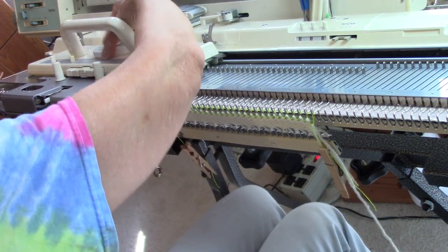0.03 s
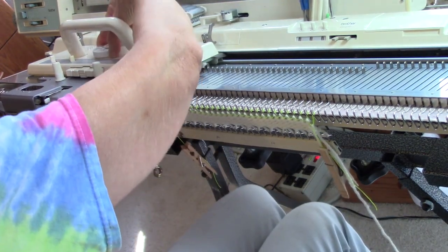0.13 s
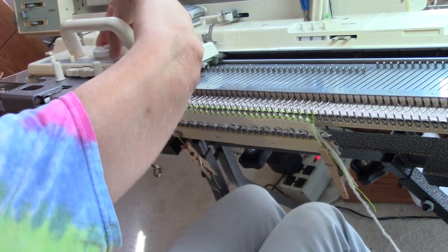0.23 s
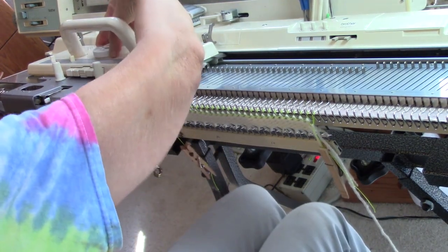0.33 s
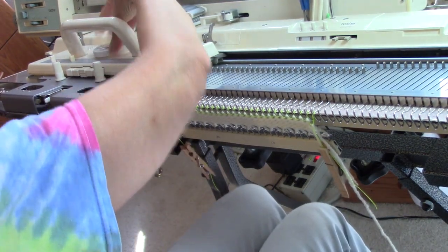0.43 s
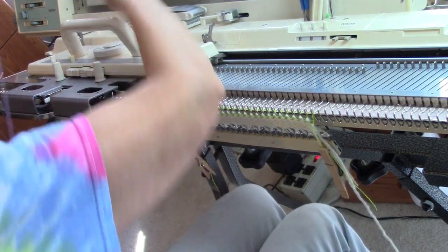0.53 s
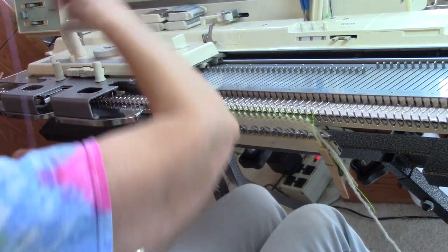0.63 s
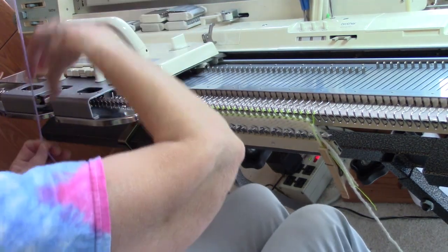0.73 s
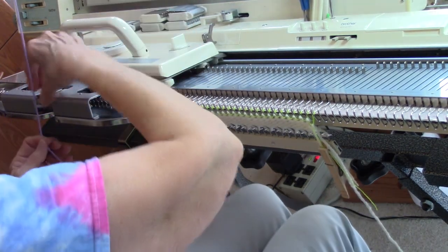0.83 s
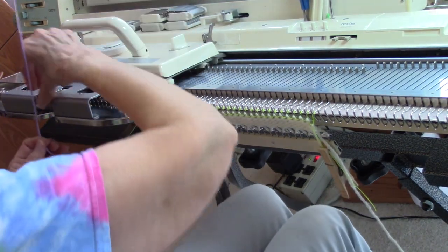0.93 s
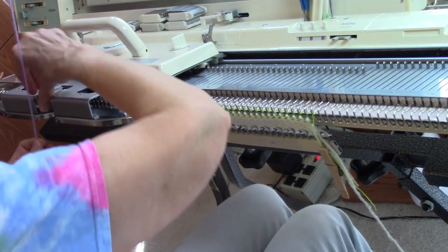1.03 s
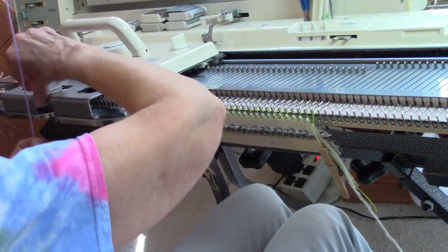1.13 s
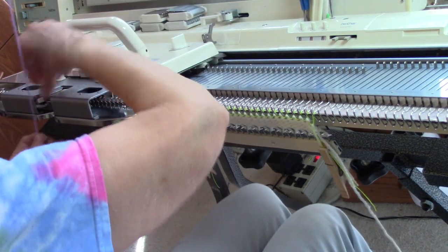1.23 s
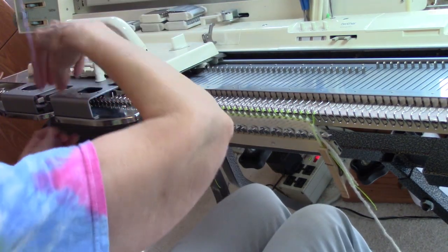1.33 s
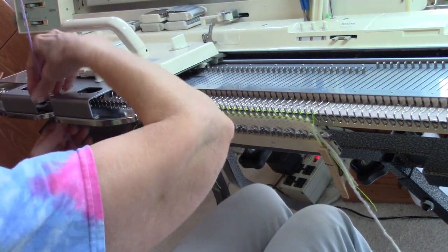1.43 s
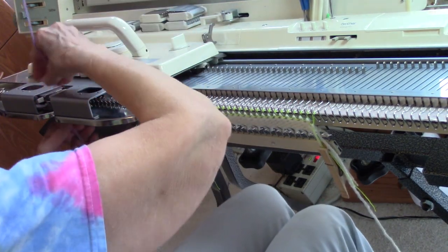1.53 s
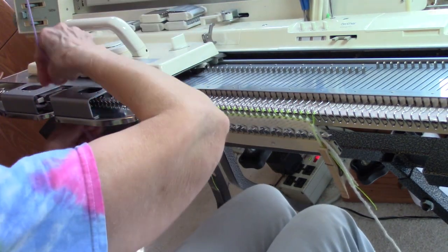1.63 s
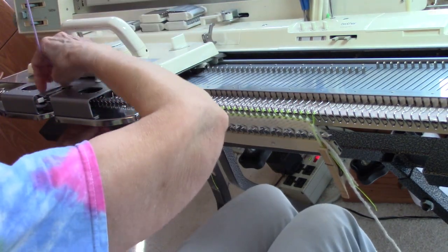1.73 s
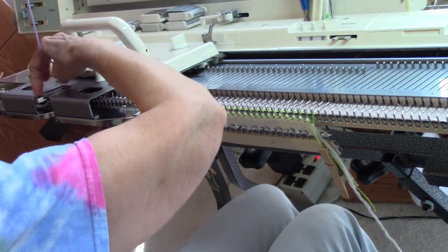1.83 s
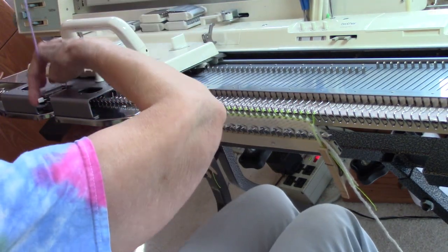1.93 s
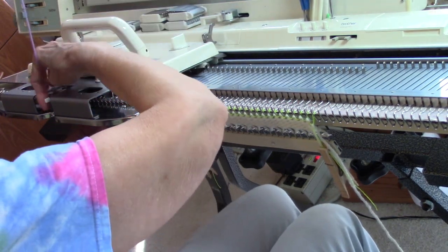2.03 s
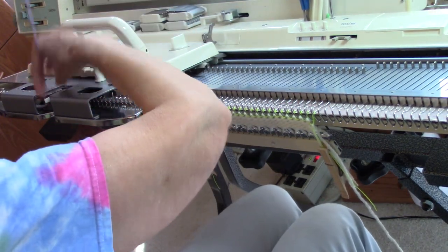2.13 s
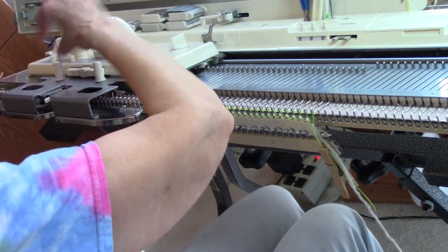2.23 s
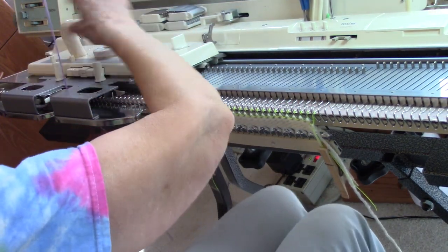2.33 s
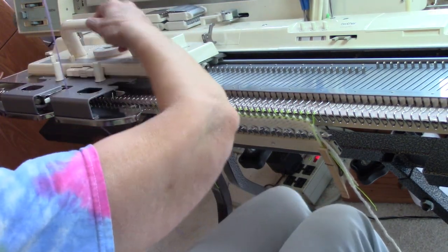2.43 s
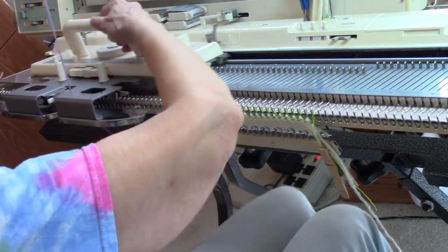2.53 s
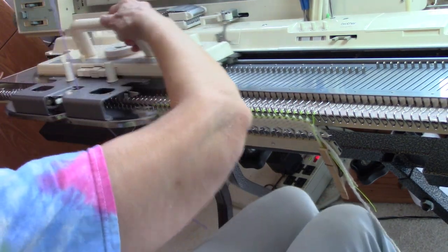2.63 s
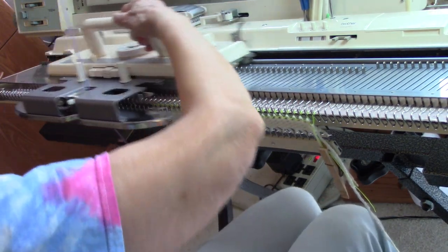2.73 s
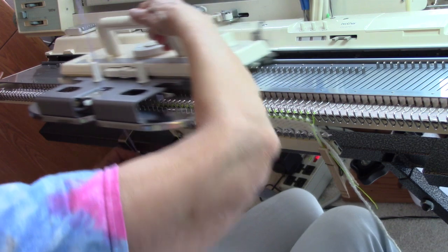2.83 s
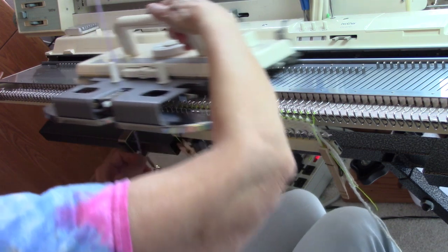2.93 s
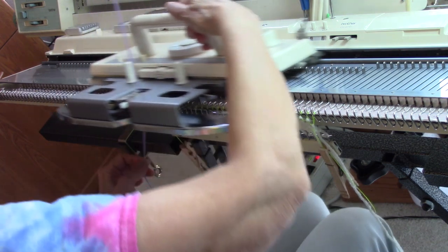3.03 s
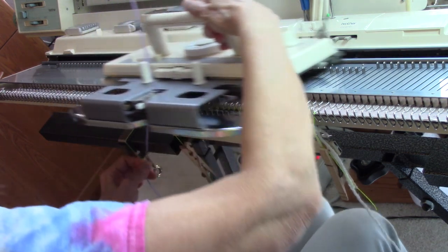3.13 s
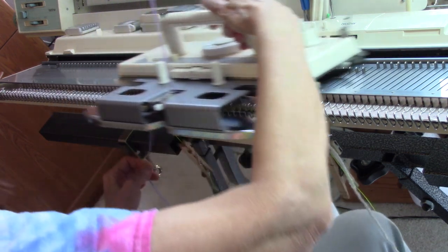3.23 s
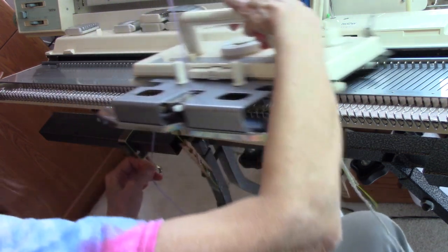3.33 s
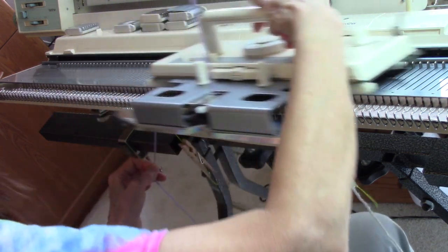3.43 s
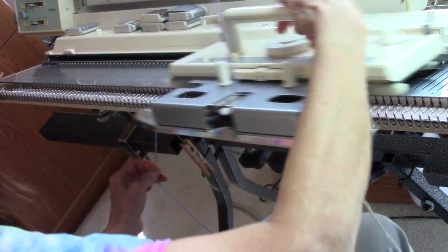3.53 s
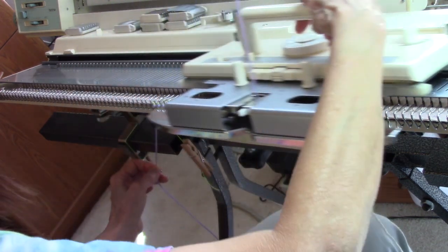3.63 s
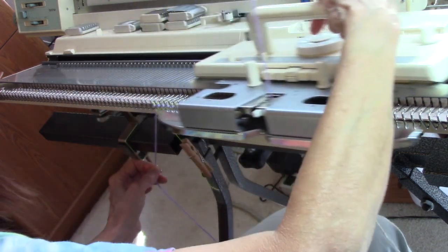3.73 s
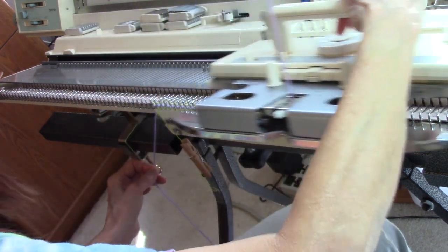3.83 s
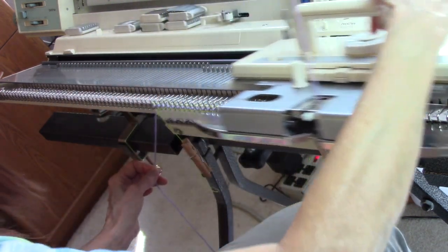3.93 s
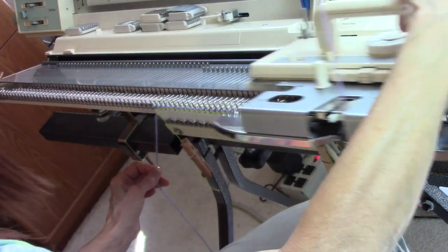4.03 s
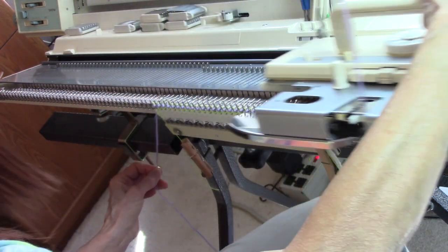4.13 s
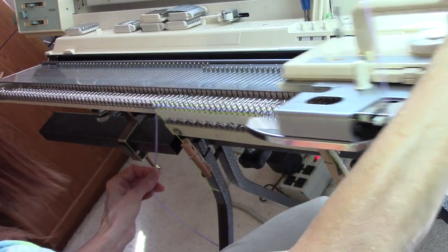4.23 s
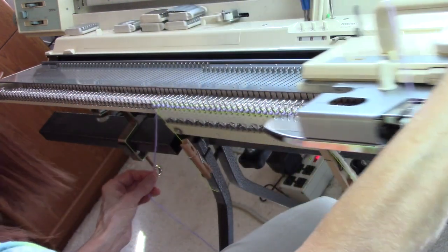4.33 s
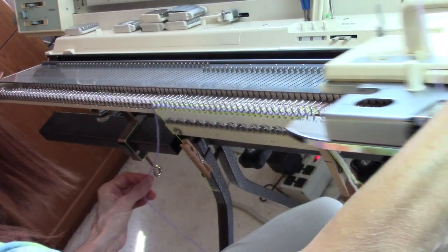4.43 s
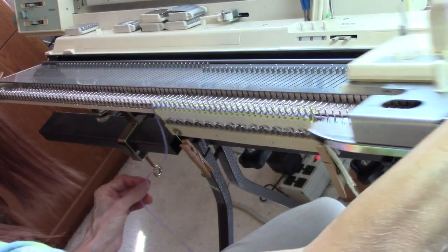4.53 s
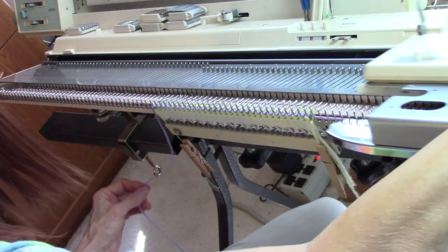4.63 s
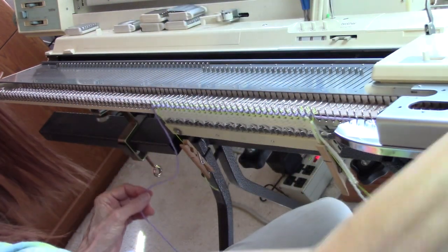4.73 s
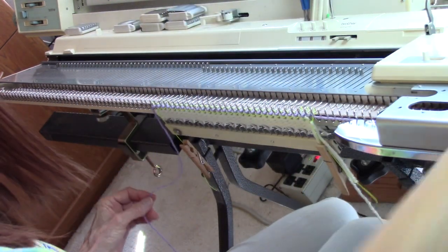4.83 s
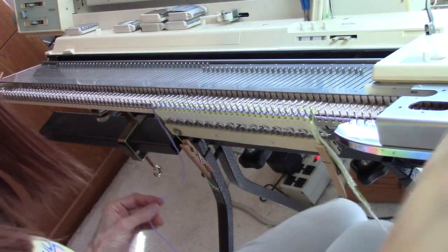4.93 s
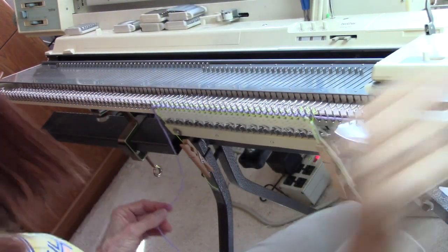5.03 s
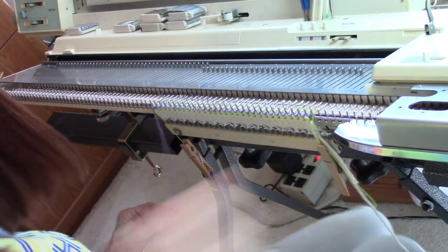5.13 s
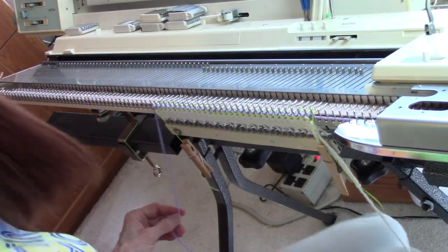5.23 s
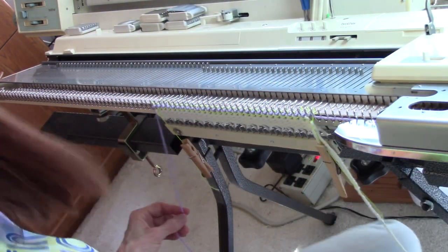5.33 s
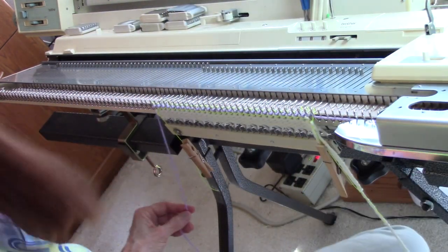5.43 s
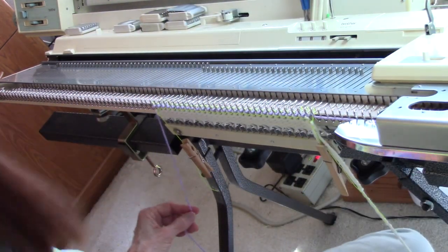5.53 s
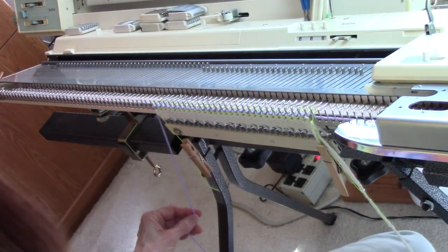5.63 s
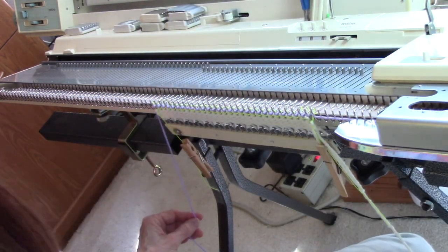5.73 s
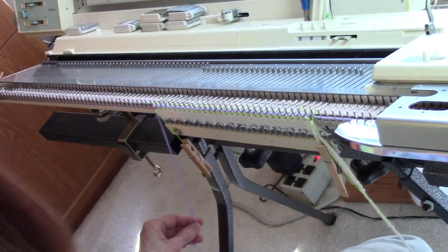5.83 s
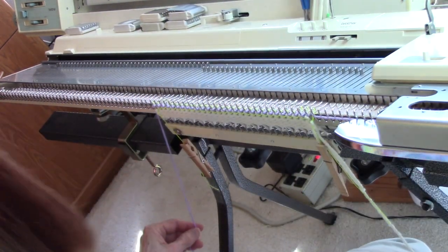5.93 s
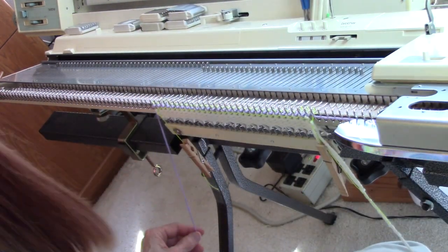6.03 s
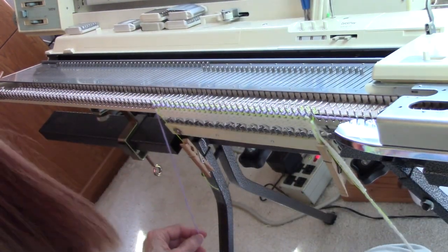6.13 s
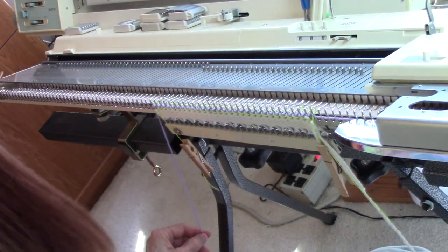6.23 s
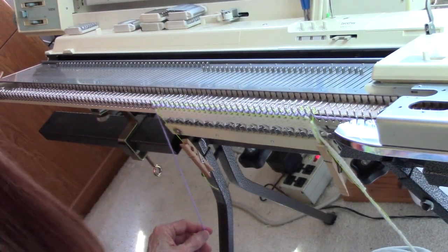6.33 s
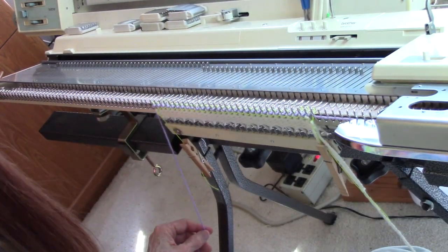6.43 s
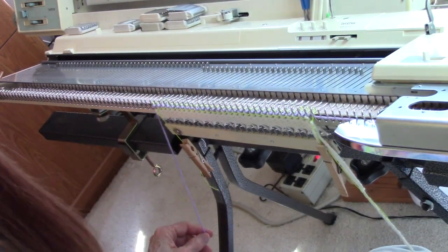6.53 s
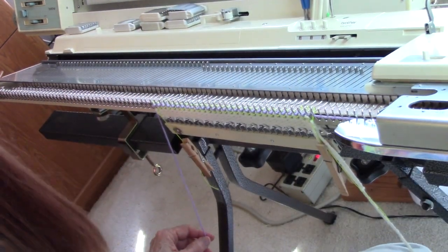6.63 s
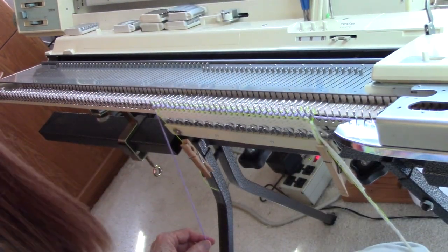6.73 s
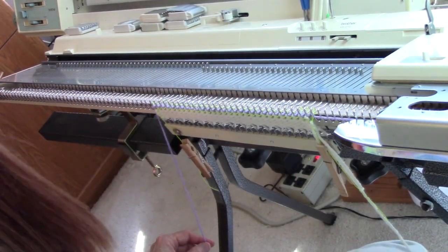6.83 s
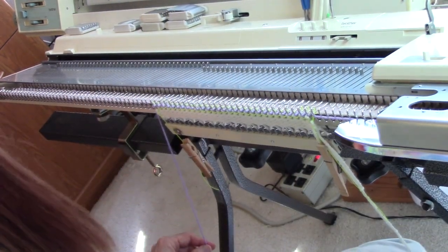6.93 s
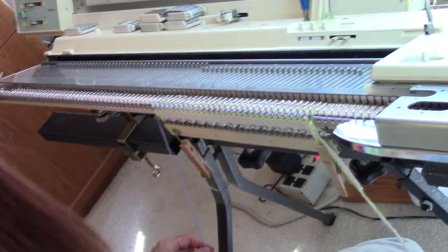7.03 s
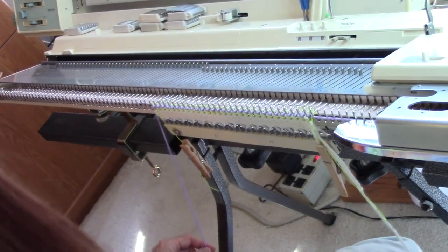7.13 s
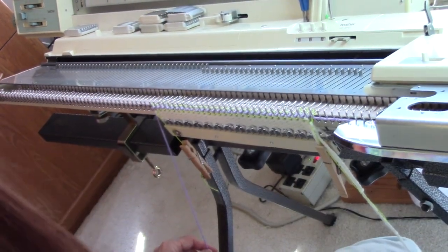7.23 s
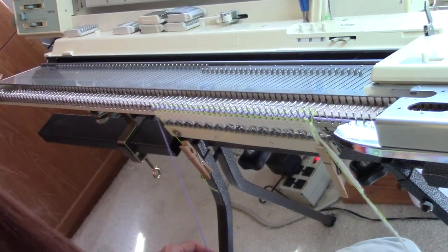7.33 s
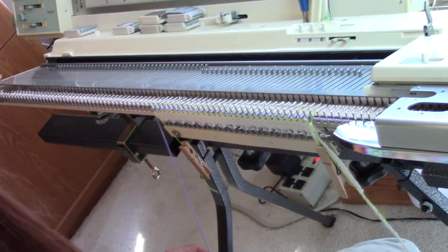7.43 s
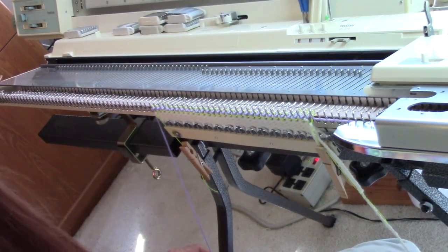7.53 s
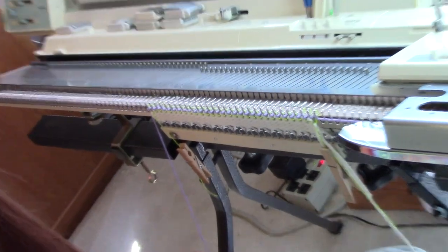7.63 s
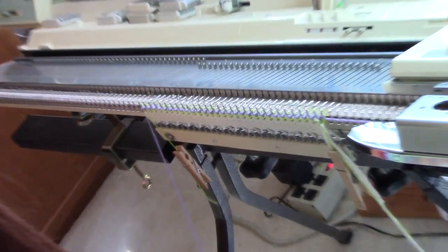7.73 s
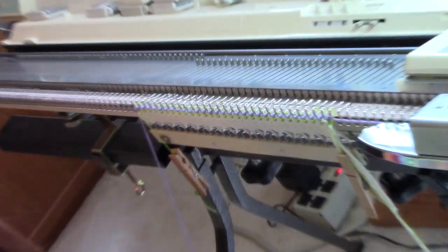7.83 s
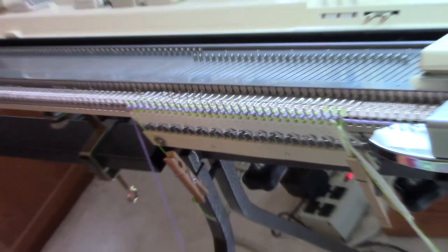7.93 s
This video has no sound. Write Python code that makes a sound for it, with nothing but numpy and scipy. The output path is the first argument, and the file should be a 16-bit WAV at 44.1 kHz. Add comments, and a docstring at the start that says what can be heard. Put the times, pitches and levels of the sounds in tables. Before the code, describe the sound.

Levers click, then a knitting machine carriage rushes across the needle bed in a loud metallic clatter, clunks to a stop, then close finger taps.

```python
"""Knitting machine in a small room

Levers click, then the carriage is pushed from left to right over the needle bed in a rush of tiny steel
impacts, clunks on the way and rattles to a stop; later fingers tap and rub a camera in the room.
Contacts are random impulses shaping coloured noise, blows are decaying noise bursts, steel rings as
decaying tones. Room noise and faint camera ticks run throughout.
"""
import sys
import numpy as np
from scipy import signal
from scipy.fft import rfft, irfft, next_fast_len
from scipy.io import wavfile
from scipy.ndimage import uniform_filter1d, map_coordinates

SR = 44100
rng = np.random.default_rng(int(sys.argv[2]) if len(sys.argv) > 2 else 0)


def wrap_up_sound(samples):
    """Save the sound to the file named by the first command line argument, as 16-bit audio."""
    columns = np.atleast_2d(samples).T
    # keep every value between -1 and 1, then stretch to whole-number steps
    tamed = np.clip(columns, -1, 1)
    steps = np.round(tamed * 32767).astype(np.int16)
    wavfile.write(sys.argv[1], SR, steps)


N = 352800


def amp(db):
    """Decibels to gain."""
    return 10 ** (np.asarray(db) / 20)


def unit(x):
    """Scaled to rms 1."""
    return x / np.sqrt(np.mean(x ** 2) + 1e-20)


def clock():
    """Time of every sample in seconds."""
    return np.arange(N) / SR


def along(points, hz):
    """Curve through (Hz, value) points, read on a log frequency axis."""
    point_hz, value = np.transpose(points)
    return np.interp(np.log(hz + 1), np.log(point_hz), value)


def filtered(x, response):
    """x times a response of frequency, zero-padded against wrap-around."""
    size = next_fast_len(N + SR // 2, True)
    spectrum = rfft(x, size) * response(np.fft.rfftfreq(size, 1 / SR))
    return irfft(spectrum, size)[..., :N]


def bands(colour, low_hz, high_hz):
    """Independent coloured noises for the low, middle and high band, rms 1 each."""
    def above(hz, edge_hz):
        return 1 / (1 + (edge_hz / (hz + 1)) ** 12)

    power_shares = [
        lambda hz: 1 - above(hz, low_hz),
        lambda hz: above(hz, low_hz) * (1 - above(hz, high_hz)),
        lambda hz: above(hz, high_hz)]
    noises = []
    for share in power_shares:
        response = lambda hz: amp(along(colour, hz)) * np.sqrt(share(hz))
        noises.append(unit(filtered(rng.standard_normal(N), response)))
    return np.array(noises)


def fading(t, t60_s, attack_s):
    """Quick rise times exponential decay."""
    return amp(-60 * t / t60_s) * (1 - np.exp(-t / attack_s))


def add(track, start_s, sound):
    """Mix a sound into a track in place."""
    part = track[..., max(round(start_s * SR), 0):][..., :sound.shape[-1]]
    part += sound[..., :part.shape[-1]]


def resonate(x, peaks):
    """Each resonance in turn lifts its own band and rings on briefly."""
    for hz, width_hz, lift_db in peaks:
        b, a = signal.iirpeak(hz, hz / width_hz, SR)
        x = x + (amp(lift_db) - 1) * signal.lfilter(b, a, x)
    return x


def wobble(knots_hz):
    """Smooth random curve through knots_hz random knots a second."""
    knots = rng.standard_normal(int(N * knots_hz / SR) + 4)
    return map_coordinates(knots, [clock() * knots_hz])


def impacts(rate_hz, spread_db, life_s):
    """Envelope of rms 1: random contacts of random energy, each energy decaying over life_s."""
    hits = rng.random(N) < rate_hz / SR
    energy = hits * amp(spread_db * rng.standard_normal(N)) ** 2 / rate_hz
    decay = np.exp(-1 / (life_s * SR))
    return unit(np.sqrt(signal.lfilter([1], [1, -decay], energy)))


def friction(strokes, colour, slip_hz):
    """Strokes that swell and die away, made of tiny random slips."""
    _, middle, treble = bands(colour, 510, 4400)
    out = np.zeros(N)
    for peak_s, db, rise_s, fall_s, treble_db in strokes:
        pressure = np.interp(clock(), [peak_s - rise_s, peak_s, peak_s + fall_s], [0, 1, 0])
        out += amp(db) * pressure * (middle + amp(treble_db) * treble)
    return out * impacts(rate_hz=slip_hz, spread_db=4, life_s=.001)


def blows(rows, noise, t60_s, attack_s, trim_db):
    """Bursts of low, middle and high noise, each band with its own rise and decay."""
    force, t = np.zeros((3, N)), np.arange(SR // 5) / SR
    shape = fading(t, np.array(t60_s)[:, None], np.array(attack_s)[:, None])
    for start_s, db, low_db, high_db in rows:
        band_db = db + np.array([low_db, 0, high_db]) + trim_db
        add(force, start_s, amp(band_db)[:, None] * shape)
    return np.sum(force * noise, axis=0)


def clangs(rows):
    """A struck part rings in a tight cluster of modes: one decaying tone whose phase wanders."""
    out, t = np.zeros(N), np.arange(SR // 3) / SR
    for start_s, db, hz, width_hz, t60_s in rows:
        steps = rng.standard_normal(len(t))
        wander = np.cumsum(steps) * np.sqrt(2 * np.pi * width_hz / SR)
        wander = uniform_filter1d(wander, size=40)
        tone = np.sin(2 * np.pi * hz * t + wander)
        add(out, start_s, amp(db) * tone * fading(t, t60_s, .0012))
    return out


# Colour of the room noise. Each row: frequency in Hz, relative level in dB per Hz.
AIR_COLOUR = [(15, -49), (25, -25.5), (49, -21.5), (117, -8.5), (149, -2.5), (317, -5), (344, -5.5),
              (677, -10), (818, -14.5), (1560, -17.5), (1840, -19.5), (2000, -21), (4610, -28),
              (9320, -34.5), (16000, -45)]
# Left-right correlation of the room noise. Each row: frequency in Hz, correlation [0..1].
AIR_LIKENESS = [(60, 0.82), (180, 0.91), (550, 0.84), (1650, 0.74), (4970, 0.65), (15000, 0.93)]
AIR_RMS_DB = -53


def room_noise():
    """Steady low rush: shared mid noise plus side noise sets the left-right correlation."""
    def mid_and_side(hz):
        turn_rad = np.arccos(np.clip(along(AIR_LIKENESS, hz), -1, 1)) / 2
        return amp(along(AIR_COLOUR, hz)) * [np.cos(turn_rad), np.sin(turn_rad)]

    mid, side = filtered(rng.standard_normal((2, N)), mid_and_side)
    return amp(AIR_RMS_DB) * unit(np.array([mid + side, mid - side]))


# Hand and yarn brushing and jiggling the carriage. Each row: peak time in seconds, level in dB,
# rise in seconds, fall in seconds, treble in dB re middle band.
BRUSHES = [(.002, -40, .04, 0.13, -15), (.295, -53, 0.049, 0.059, -24), (1.69, -65.5, 0.19, 0.16, 3),
           (2.69, -53.5, 0.17, 0.15, -7), (4.8, -56, 0.057, 0.064, -11)]
# Colour of the carriage's plastic shell. Each row: frequency in Hz, relative level in dB per Hz.
SHELL_COLOUR = [(60, -29), (200, -6), (380, -2), (600, 6), (950, 1.5), (1350, -3), (2100, -7.5),
                (3000, -11), (3700, -10.5), (4600, -18), (7500, -18.5), (9000, -16), (12000, -28),
                (16000, -37)]


def brushes():
    """Hand and yarn slip over the carriage shell."""
    return friction(BRUSHES, SHELL_COLOUR, slip_hz=1200)


# The whole carriage knocking on its rail. Each row: start in seconds, level in dB before band trims,
# low band in dB re level, high band in dB re level.
KNOCKS = [(0.0226, -24, -10.5, -12), (0.0688, -22.5, -12, -13), (0.1115, -22, -11, -11),
          (0.312, -33, -2.5, -24), (0.3501, -40.5, 0.5, -28), (0.443, -52.5, 8.5, -21),
          (0.5033, -47, 0.5, -21), (0.6275, -53.5, 6, -21), (0.6864, -49.5, 1, -18),
          (2.4976, -45, 0.5, -18), (2.516, -44.5, -2, -21), (4.3177, -24, -24, -17.5),
          (4.359, -43.5, -8, -4), (4.3885, -18.5, -17, -13)]


def knocks():
    """The carriage rocks on its rail: duller and longer than a snap."""
    noise = bands(SHELL_COLOUR, 1180, 4500)
    return blows(KNOCKS, noise, t60_s=[.11, .07, .055], attack_s=[.0012, .0008, .0004], trim_db=[1, -6, 0])


def camera_ticks():
    """The camera's mechanism ticks about fifteen times a second: gated noise around 2 kHz."""
    t = (clock() - .049) % (1 / 14.985)
    tone = filtered(rng.standard_normal(N), lambda hz: 1 / (1 + ((hz - 2020) / 230) ** 2))
    return amp(-55.5) * unit(tone) * fading(t, .05, .002)


# Levers, cams and needles snapping. Each row: start in seconds, level in dB before trims,
# body in dB re level, treble in dB re level.
CLICKS = [(0.9716, -44, -14, -3.5), (1.066, -47.5, -9, -5.5), (1.1022, -31, -11.5, 1),
          (2.013, -34, -23, 13), (2.0163, -20, -9.5, -13), (2.6775, -31.5, -22, -15.5),
          (2.7826, -27.5, -19, -9), (3.242, -7.5, -13.5, -4.5), (4.093, -13, -39, -10.5),
          (4.1084, -25, -8.5, -3), (4.1423, -24.5, -16, -6.5), (4.178, -22, -29, -12),
          (4.1903, -17.5, -23, -6.5), (5.2178, -58.5, -11, 7.5), (5.924, -46, -14, -9)]
# Steel modes rung by each snap. Each row: frequency in Hz, relative level in dB, t60 in seconds.
STEEL_MODES = [(784, 3.5, 0.21), (1252, 0.5, 0.101), (1623, -9.5, 0.22), (1727, 0, 0.22), (3090, -30, 0.37),
               (3300, -15, 0.27), (3670, -22.5, 0.21), (5570, -10.5, 0.17), (7800, -22.5, 0.24),
               (8861, -19.5, 0.15), (9313, -33.5, 0.2), (9800, -38.5, 0.26)]
# Colour of a steel lever snapping. Each row: frequency in Hz, relative level in dB per Hz.
LEVER_COLOUR = [(60, -37), (300, -13.5), (500, 1.5), (1000, -1.5), (1500, 3.5), (2000, 0), (3000, 3),
                (4400, -4), (6600, -0.5), (7700, 2.5), (9600, 3.5), (11500, -4), (16000, -12)]


def clicks():
    """Each snap is a short burst of chatter that leaves the steel modes ringing."""
    ring, t = np.zeros(N), np.arange(SR // 3) / SR
    mode_hz, mode_db, mode_t60_s = np.transpose(STEEL_MODES)
    modes = np.sin(2 * np.pi * mode_hz[:, None] * t) * fading(t, mode_t60_s[:, None], .0004)
    for start_s, db, body_db, treble_db in CLICKS:
        tilt_db = np.interp(np.log(mode_hz), np.log([700, 2500, 8000]), [body_db, -7, treble_db + 7])
        scatter_db = rng.normal(0, 2, len(mode_hz))
        add(ring, start_s, amp(db + tilt_db + mode_db - 11 + scatter_db) @ modes)
    noise = bands(LEVER_COLOUR, 1300, 5500)
    chatter = blows(CLICKS, noise, t60_s=[.08, .05, .032], attack_s=[.001, .0004, .0002], trim_db=[1, -5, 3])
    return ring + chatter


# Hard blows that make one part ring out. Each row: start in seconds, level in dB, frequency in Hz,
# line width in Hz, t60 in seconds.
CLANGS = [(.972, -57, 5500, 400, .18), (1.102, -40, 5500, 420, .17), (2.013, -27, 7770, 280, 0.045),
          (3.243, -13.5, 509.5, 7.3, 0.099), (4.094, -18, 2240, 220, 0.085), (4.39, -25, 1590, 150, .1),
          (4.39, -24, 1054, 95, 0.06), (5.375, -46, 1180, 66, .05)]


def machine_clangs():
    """Struck machine parts ring as narrow clusters of modes."""
    return clangs(CLANGS)


# The sliding carriage, levels before trims and swells. Each row: time in seconds, body in dB,
# needle clatter in dB, latch hiss in dB.
TRAVEL = [(2.79, -75, -68, -72.5), (2.809, -40, -34, -35), (2.841, -36.5, -33.5, -34.5),
          (2.88, -34, -29.5, -28.5), (2.93, -33.5, -27, -26.5), (2.999, -36.5, -26.5, -27),
          (3.05, -35.5, -27, -27.5), (3.12, -31, -25.5, -24.5), (3.21, -32.5, -23, -23.5),
          (3.32, -33, -24, -22), (3.42, -31, -23, -22), (3.52, -30, -20.5, -19.5), (3.58, -33.5, -28, -27),
          (3.63, -40.5, -33.5, -34), (3.72, -40.5, -35.5, -31), (3.83, -32, -27, -21.5),
          (3.92, -35, -30, -27.5), (4.0, -38, -37.5, -35), (4.07, -45, -37, -38.5),
          (4.16, -36.5, -37.5, -41), (4.22, -40, -41, -42), (4.27, -40, -44.5, -45), (4.305, -53, -64, -75),
          (4.37, -67, -60, -73), (4.49, -58, -60, -67.5), (4.58, -54.5, -59, -63.5), (4.7, -76, -78.5, -82)]
# The cams catch a group of needles. Each row: start in seconds, swell in dB before its rise and decay.
CATCHES = [(2.806, 2.5), (2.928, 1.5), (3.42, 2), (3.49, -4.5), (3.607, 6), (3.646, 4.5), (3.69, 7.5),
           (3.732, 3.5), (3.767, -0.5), (3.797, -3), (3.838, 2), (3.94, 5.5), (3.978, 6.5), (4.01, 5),
           (4.045, 7)]
# Colour of steel sliding on steel. Each row: frequency in Hz, relative level in dB per Hz.
METAL_COLOUR = [(40, -50), (130, -7.5), (250, -12.5), (350, -4.5), (430, -6), (510, 0.5), (1500, 1.5),
                (3000, 1), (4700, -4.5), (7200, -2), (10000, -1.5), (12000, -10.5), (16000, -16.5)]


def slide():
    """Needle butts strike the cams and latches flick; contacts thin out as the hiss level falls."""
    time_s, *columns = np.transpose(TRAVEL)
    level_db = np.array([np.interp(clock(), time_s, col, left=-120, right=-120) for col in columns])
    swell_db, t = np.zeros(N), np.arange(SR // 8) / SR
    for start_s, db in CATCHES:
        add(swell_db, start_s, db * fading(t, 0.17, .001))
    hiss_db = level_db[2]
    speed = amp(np.clip(hiss_db - hiss_db.max(), -25, 0))
    clatter = impacts(rate_hz=3400 * speed + 150, spread_db=0.5, life_s=0.0016)
    # the balance of the three bands wavers
    trim_db = np.array([[-4.5], [-5.0], [-1.8]]) + 1.2 * np.array([wobble(70) for _ in range(3)])
    gain = amp(level_db + swell_db + trim_db)
    return clatter * np.sum(gain * bands(METAL_COLOUR, 1200, 5000), axis=0)


# Bed resonances with the carriage on the left half.
# Each row: frequency in Hz, width in Hz, lift in dB.
BED_LEFT = [(561, 57, 9), (784, 33, 6.5), (950, 53, 4), (1178, 109, 1), (1500, 180, 3), (1843, 190, 1.5),
            (2410, 54, 1), (2550, 198, 5.5), (2920, 278, -0.5), (3400, 290, 2), (3940, 99, 1.5)]
# Bed resonances with the carriage on the right half.
# Each row: frequency in Hz, width in Hz, lift in dB.
BED_RIGHT = [(630, 29, 11.2), (760, 61, 4), (935, 83, 5.2), (1127, 73, 8.5), (1300, 38, 1), (1578, 52, 4.4),
             (1893, 240, 6), (2310, 136, 3.4), (2560, 100, 4.8), (2900, 181, 4.3), (3262, 120, 3),
             (3680, 590, 6.6)]


def bed(x):
    """The bed's resonances crossfade as the carriage crosses its middle."""
    right = np.clip((clock() - 3.55) / .2, 0, 1)
    return (1 - right) * resonate(x, BED_LEFT) + right * resonate(x, BED_RIGHT)


# Fingers sliding on the camera. Each row: peak time in seconds, level in dB before the rub trim,
# rise in seconds, fall in seconds, treble in dB re middle band.
RUBS = [(6.05, -55.5, 0.16, 0.15, -10), (6.145, -45.5, .03, .06, -16.5), (6.27, -55, .05, .13, -15),
        (6.46, -53.5, .03, .03, -12), (6.724, -46, 0.1, 0.017, -2.5), (6.95, -55.5, 0.037, 0.054, 1),
        (7.02, -40, 0.033, 0.072, -16.5), (7.087, -38, 0.033, 0.021, -8.5), (7.19, -45.5, .02, 0.054, -9),
        (7.245, -37, .013, .05, -14), (7.345, -46, .025, 0.085, -13), (7.68, -50.5, .06, 0.024, -14.5)]
# Colour of the camera's plastic case. Each row: frequency in Hz, relative level in dB per Hz.
CASE_COLOUR = [(40, -25), (120, -4), (260, 8), (480, -2.5), (1000, 3.5), (2100, 5.5), (3400, -6),
               (4400, -12.5), (6800, -20.5), (9000, -27), (16000, -41)]
# Hollows of the case excited by rubbing. Each row: frequency in Hz, width in Hz, lift in dB.
HOLLOWS = [(1300, 350, 1), (2200, 450, 1.5), (4750, 700, 4.5), (6630, 600, 5.5)]


def rubs():
    """Finger slips on the camera's case excite its hollows."""
    slips = friction(RUBS, CASE_COLOUR, slip_hz=4000)
    return amp(-2.0) * resonate(slips, HOLLOWS)


# Fingers tapping the camera. Each row: start in seconds, level in dB before band trims,
# thump in dB re level, treble in dB re level.
TAPS = [(6.092, -27, -18, -17), (6.5, -38.5, -22, -2.5), (6.602, -34.5, -20, -17), (6.609, -30.5, -23, -26),
        (6.627, -16.5, -11, -24), (6.633, -23, -10, -12.5), (6.653, -37, -10, -24), (6.797, -38, -10, -11),
        (6.997, -27.5, -10, -20), (7.237, -23.5, -12.5, -21), (7.335, -29, -24, -20),
        (7.486, -39, -19, -21), (7.555, -40, 0, -24), (7.59, -19, -14.5, -26), (7.709, -31, -15.5, -34)]
# Pitched rings of the tapped case. Each row: start in seconds, level in dB, frequency in Hz,
# line width in Hz, t60 in seconds.
CASE_RINGS = [(6.091, -28, 2600, 150, .025), (6.627, -24, 2080, 310, .04), (6.632, -26, 300, 30, .05),
              (7.484, -34.5, 1064, 100, .04), (7.59, -41.5, 197, 13, 0.15),
              (7.591, -25.5, 1040, 340, 0.037)]


def taps():
    """Dry knocks through the case, the thump outlasting the tick; some taps ring the case."""
    noise = bands(CASE_COLOUR, 550, 4040)
    knock = blows(TAPS, noise, t60_s=[.07, .03, .022], attack_s=[.002, .0007, .0003], trim_db=[-2, -3.3, 2.5])
    return knock + clangs(CASE_RINGS)


def squeak():
    """One finger squeaks faintly on the plastic: a jittery tone rising in pitch."""
    jitter = unit(uniform_filter1d(rng.standard_normal(N), size=60))
    hz = np.interp(clock(), [6.695, 6.73], [1980, 2230]) * (1 + 0.025 * jitter)
    swell = np.interp(clock(), [6.69, 6.718, 6.742], [0, 1, 0])
    return amp(-41) * swell * np.sin(2 * np.pi * np.cumsum(hz) / SR)


# Decay of the room. Each row: frequency in Hz, t60 in seconds.
ROOM_DECAY = [(200, 0.34), (800, 0.31), (2500, 0.28), (6000, 0.23), (14000, 0.11)]
# Stereo width of the room's answer. Each row: frequency in Hz, side in dB re mid.
ROOM_WIDTH = [(200, -21), (1000, -34), (2500, -44.5), (4800, -9.5), (7000, -17), (14000, -18)]


def room(x):
    """Short diffuse reverberation: decaying noise tails, a fresh one every quarter second."""
    out, step = np.zeros((2, N)), SR // 4
    for start in range(0, N, step):
        hz, t, cells = signal.stft(rng.standard_normal((2, SR // 3)), SR, nperseg=256)
        decay = amp(-60 * t / along(ROOM_DECAY, hz)[:, None])
        tail = signal.istft(cells * decay, SR, nperseg=256)[1]
        tail = tail / np.linalg.norm(tail[0])
        answer = signal.fftconvolve(x[None, start:start + step], tail, axes=1)
        add(out, start / SR + .004, answer)
    mid = out[0]
    side = filtered(out[1], lambda hz: amp(along(ROOM_WIDTH, hz)))
    return np.array([mid + side, mid - side])


def scene():
    """The machine with its room reverberation, dry handling of the camera, and room noise."""
    machine = brushes() + knocks() + clicks() + machine_clangs() + bed(slide())
    handling = camera_ticks() + rubs() + taps() + squeak()
    # high-pass at 125 Hz keeps the short bursts free of deep bass
    no_bass = signal.butter(2, 125, "high", fs=SR, output="sos")
    sources = machine + amp(-7.5) * room(machine) + handling
    return signal.sosfilt(no_bass, sources) + room_noise()


TOP_HZ = 16100


def record(dry):
    """Band limit: gain falls to zero over the last 200 Hz below TOP_HZ."""
    return filtered(dry, lambda hz: np.clip((TOP_HZ - hz) / 200, 0, 1))


dry = scene()
out = record(dry)
wrap_up_sound(out)
```